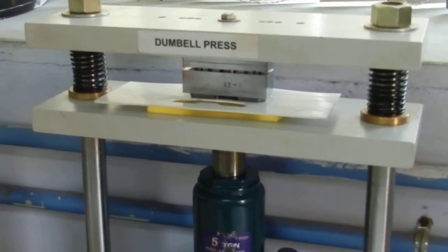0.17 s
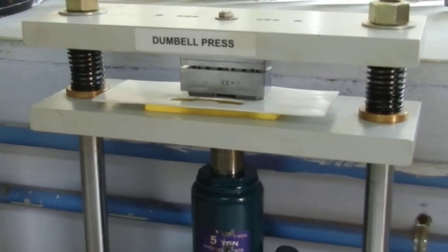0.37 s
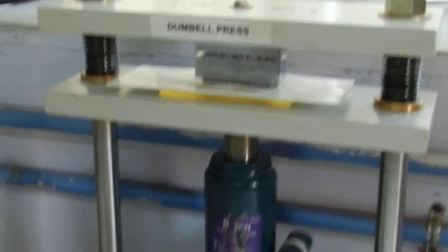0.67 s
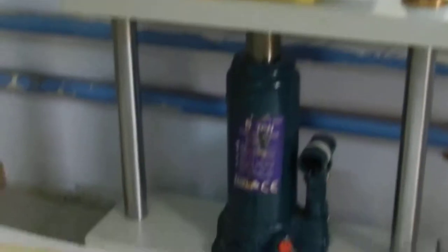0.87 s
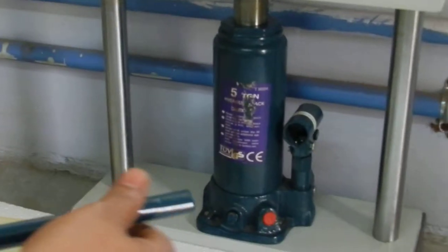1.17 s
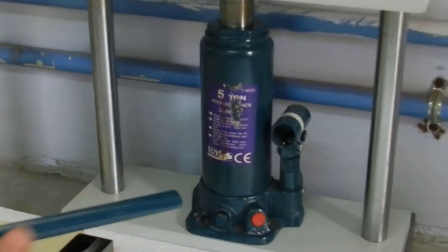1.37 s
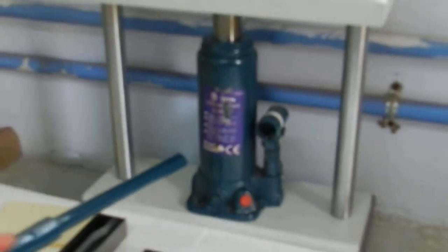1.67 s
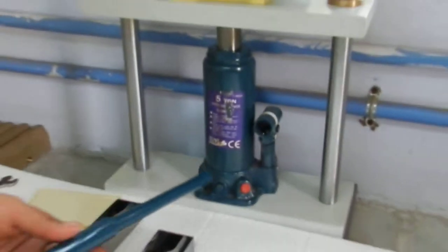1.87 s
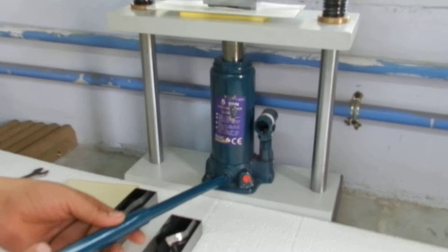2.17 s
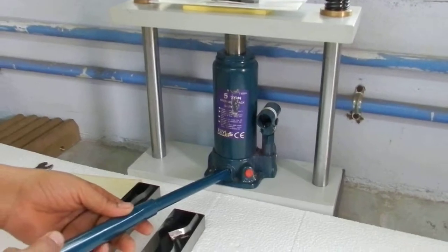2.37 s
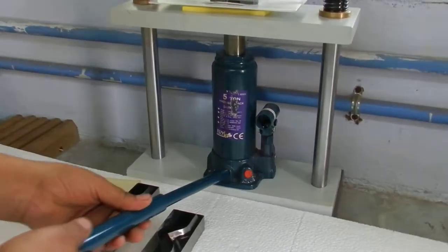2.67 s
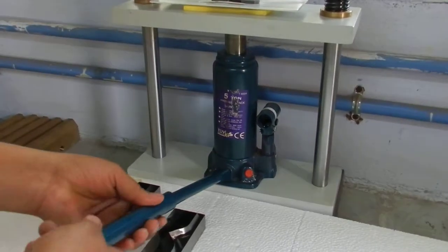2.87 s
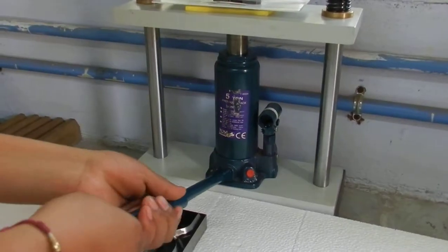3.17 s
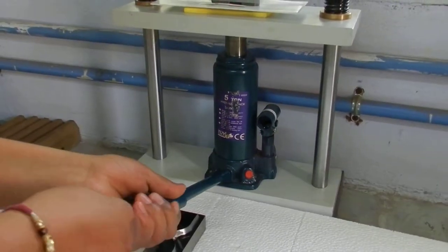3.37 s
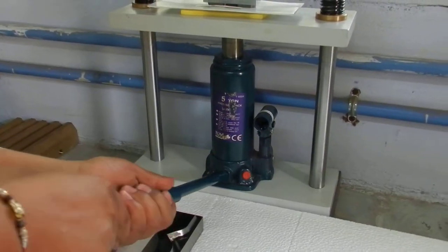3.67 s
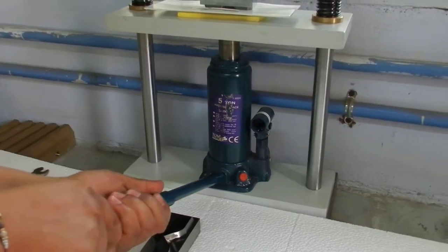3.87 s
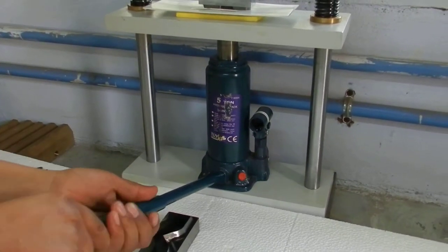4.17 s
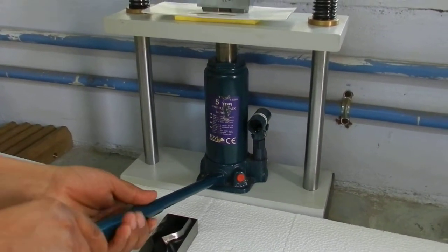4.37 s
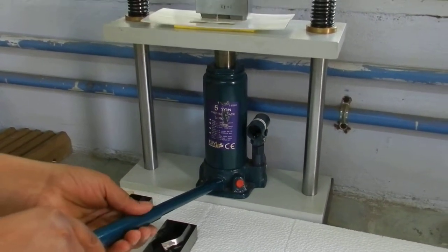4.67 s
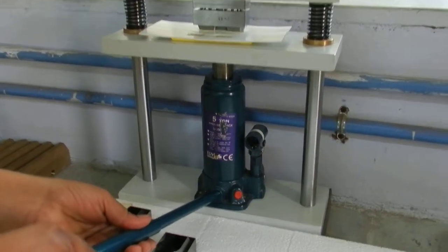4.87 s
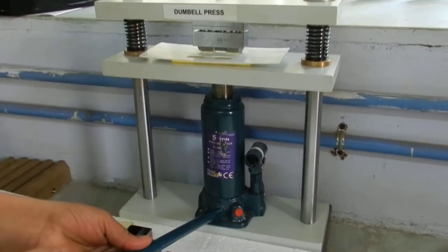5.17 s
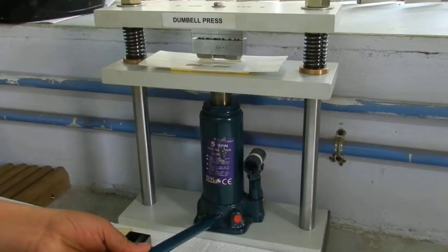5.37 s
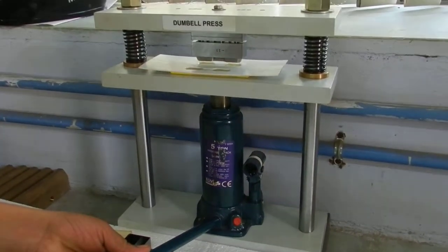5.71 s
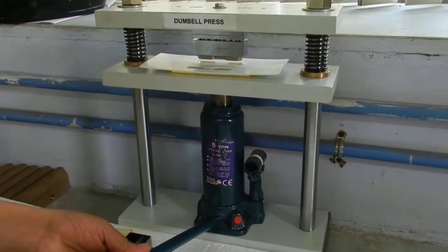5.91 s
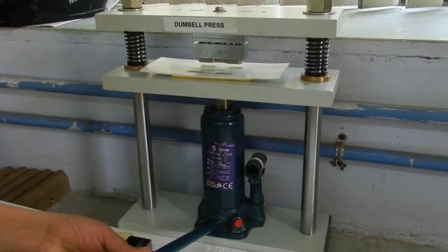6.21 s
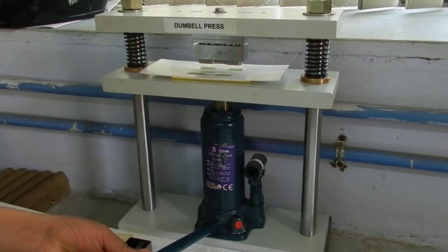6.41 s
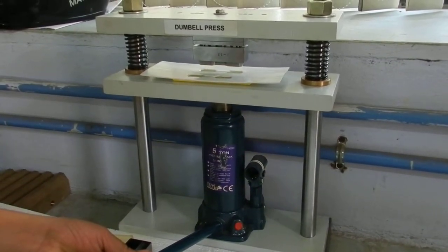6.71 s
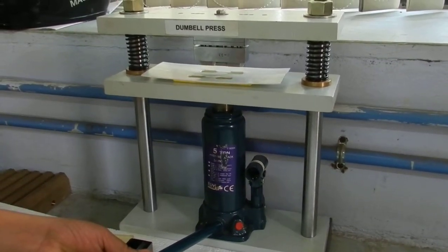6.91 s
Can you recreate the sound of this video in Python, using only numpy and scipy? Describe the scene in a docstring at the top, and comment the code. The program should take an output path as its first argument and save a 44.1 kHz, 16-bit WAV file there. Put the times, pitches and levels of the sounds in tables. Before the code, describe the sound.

From 0 to 1.4 s a large fan runs steadily in a workshop: a low, slightly wavering hum with buzzing overtones under a broad airy roar, while a faint high whine fades in. At about 1.45 s come tiny, dry metal ticks, slightly to the right. From 1.55 s a draught strikes the microphone, growing by 2 s into loud, lumpy low rumble. Until 6.5 s irregular short gusts and hard pressure pops follow several times a second, scattered between left and right, often stronger left, with brief lulls. The peaks clip, and the overall level suddenly ducks and climbs back repeatedly. The whine is clearest around 2 to 3 s, then weakens under the wind. Pops crowd between 3.5 and 6 s. After 6.5 s the wind collapses and the fan's hum and roar return, the deep hum weaker; a small soft gust puffs at about 6.85 s, then only fan remains until 7.1 s.

```python
"""A large fan hums and roars in a workshop; then its draught swings onto two microphone ports as a lumpy
rumble with short hard gusts and sharp pops that overload the input. The level drops and climbs back.
The hum is a set of sine waves tied to the fan shaft, the roar is filtered noise, and a thin whine and a few
metal ticks join them. The wind is made of sparse random kicks, filtered like swirling air at each port."""
import sys
import numpy as np
from scipy import signal
from scipy.fft import rfft, irfft
from scipy.io import wavfile
from scipy.ndimage import uniform_filter1d

SR = 44100
rng = np.random.default_rng(int(sys.argv[2]) if len(sys.argv) > 2 else 0)


def how_loud(loudness_db):
    """Turn decibels into a plain amplitude multiplier (0 dB gives 1, 20 dB gives 10)."""
    steps = np.asarray(loudness_db, float) / 20
    return 10 ** steps


def output_pcm(signal):
    """Save a mono or channel-first signal as 16-bit PCM at the path in sys.argv[1].

    Samples are clipped to [-1, 1] before scaling.
    """
    pcm = np.clip(np.atleast_2d(signal).T, -1, 1) * 32767
    wavfile.write(sys.argv[1], SR, np.round(pcm).astype(np.int16))


N = 310890  # length of the scene [samples]

# colour of swirling air at a port, before it is stretched: (frequency [Hz], relative level per Hz [dB])
EDDY_SPECTRUM = [(20, -22), (45, -20), (90, 4), (160, 0), (300, -4), (550, -15.5), (1000, -28.5),
                 (2000, -54), (4000, -59.5), (16000, -85)]


def evened(x):
    """Scales a sound to an rms of 1 along time."""
    return x / np.sqrt(np.mean(x ** 2, -1, keepdims=True) + 1e-20)


def read_spectrum(points, hz):
    """Reads a table of (frequency, value) between its points, on a log-frequency axis."""
    f, value = np.transpose(points)
    return np.interp(np.log(hz + 1), np.log(f + 1), value)


def curve(rows):
    """Joins rows of (time [s], value, ..) with straight lines into one track for each value column."""
    s, *columns = np.transpose(rows)
    return np.array([np.interp(np.arange(N) / SR, s, column) for column in columns])


def add(mix, s, sound):
    """Mixes a sound into one channel, centred on time s [s]."""
    part = mix[round(s * SR) - len(sound) // 2:][:len(sound)]
    part += sound[:len(part)]


def drift(per_s, count=1):
    """Makes slow random wandering of rms 1 that changes about per_s times a second."""
    hz = np.fft.rfftfreq(N, 1 / SR)
    smooth = np.exp(-(hz / per_s) ** 2)
    return evened(irfft(rfft(rng.standard_normal((count, N))) * smooth, N))


def jumps(shape):
    """Sparse kicks of random size over a little noise: the bass blends, the treble stays in separate edges."""
    jumps_per_s = 650
    kicks = rng.standard_normal(shape) * (rng.random(shape) < jumps_per_s / SR)
    return evened(kicks) + 0.3 * rng.standard_normal(shape)


def colour(x, spectrum, stretch=1):
    """Filters without delay; faster air stretches the whole spectrum upwards."""
    hz = np.fft.rfftfreq(x.shape[-1], 1 / SR)
    gain = how_loud(read_spectrum(spectrum, hz / stretch))
    return evened(irfft(rfft(x) * gain, x.shape[-1]))


def fan_roar():
    """Patchy air noise coloured by the resonances of the fan housing, partly alike at the two ports."""
    # air noise of the fan: (frequency [Hz], relative level per Hz [dB])
    air_noise = [(20, -24), (52, -35), (75, -11), (170, -8), (230, -6.5), (450, -7), (500, -9), (1010, -7),
                 (1350, -15), (2660, -25.5), (6650, -30), (8250, -36.5), (11000, -35), (12500, -41),
                 (15700, -39.5), (16000, -80)]
    # housing resonances: (frequency [Hz], width [Hz], boost [dB])
    housing = [(100, 16.6, 11), (1001, 21, 5.5), (1816, 220, 5.5), (2042, 26, 5.5), (3360, 680, 3.5),
               (6470, 1300, 3.5)]
    # how alike the ports are: (frequency [Hz], left-right likeness [-1 to 1])
    likeness = [(60, 0.82), (130, 0.95), (290, 0.92), (640, 1), (1410, 0.91), (3100, 0.65), (6820, 0.48),
                (15000, -0.28)]
    # balance of the ports: (frequency [Hz], left minus right [dB])
    lean = [(60, 3), (180, 0.5), (550, 3), (1650, -0.5), (4970, -2), (15000, 1)]

    frames, hz = N // 1024 + 5, np.fft.rfftfreq(4096, 1 / SR)
    a, b, c, d, patches = rng.standard_normal((frames, 2049, 5)).T
    # neighbouring frequencies and moments swell together
    patches = uniform_filter1d(patches, size=40, axis=0)
    patches = evened(uniform_filter1d(patches, size=3, axis=1))

    same = np.clip(read_spectrum(likeness, hz), -1, 1)[:, None]
    left = a + 1j * b
    right = same * left + np.sqrt(1 - same ** 2) * (c + 1j * d)
    resonance_db = sum(db / (1 + (2 * (hz - f) / width) ** 2) for f, width, db in housing)
    colour_db = read_spectrum(air_noise, hz) + resonance_db
    lean_db = np.outer([0.5, -0.5], read_spectrum(lean, hz))
    gain = how_loud((colour_db + lean_db)[:, :, None] + 0.91 * patches)
    roar = signal.istft(np.array([left, right]) * gain, nperseg=4096, noverlap=3072)[1][:, :N]
    level_db = -24 + 0.5 * drift(3.5)
    return how_loud(level_db) * roar / roar.std()


def shaft_hum():
    """Sine waves at multiples of a slightly wavering shaft speed, each wandering in level."""
    # tones of the shaft: (multiple of the shaft speed, level [dB])
    orders = [(1, -54), (3, -32.5), (4, -40.5), (6, -30), (7, -43), (9, -52), (10, -37), (12, -36),
              (15, -42), (16, -44), (21, -42), (24, -43.5), (30, -42)]
    # the deep hum is weaker once the draught blows: (time [s], level [dB])
    deep_fade = [(1.55, -0.5), (2., -1), (6.75, -8.5), (7.05, -4)]
    shaft_hz, deep_hz = 37.48, 300  # the fade applies below deep_hz

    turns = np.cumsum(shaft_hz * (1 + 0.001495 * drift(1.55)[0])) / SR
    beats_db = 1.6 * drift(6.0, count=len(orders))
    fade_db = curve(deep_fade)[0]
    hum = np.zeros(N)
    for (multiple, db), beat_db in zip(orders, beats_db):
        level_db = db + beat_db + fade_db * (multiple * shaft_hz < deep_hz)
        hum += how_loud(level_db) * np.sin(2 * np.pi * (multiple * turns + rng.random()))
    return np.sqrt(2) * hum * how_loud([[0.8], [-0.8]])  # a little louder on the left


def thin_whine():
    """One high sine wave that comes and goes, with an unsteady pitch and a flickering level."""
    # loudness of the whine: (time [s], level [dB])
    loudness = [(0, -78), (.8, -56), (1.45, -49.5), (2.1, -47.5), (3.1, -47.5), (3.55, -57), (3.7, -62),
                (7.1, -57)]
    whine_hz = 2794
    turns = np.cumsum(whine_hz + 9.6 * drift(21.0)[0]) / SR
    flicker_db = 2.5 * drift(20.0)[0]
    return np.sqrt(2) * how_loud(curve(loudness)[0] + flicker_db) * np.sin(2 * np.pi * turns)


def metal_ticks():
    """Each small metal tick is one ringing tone that dies away by 60 dB in 4.2 ms."""
    # ticks: (time [s], level [dB], pitch [Hz])
    tick_list = [(1.437, -30, 3960), (1.472, -17, 4570), (1.472, -26, 3300)]
    out, t = np.zeros(N), np.arange(600) / SR
    for s, db, hz in tick_list:
        tick = how_loud(db - 60 * t / 0.0042) * np.sin(2 * np.pi * hz * t)
        add(out, s + t[300], tick)  # centred half its length later, so it starts at s
    return out * how_loud([[-1.5], [1.5]])  # a little louder on the right


def lumpy_breeze():
    """The steady part of the draught: separate turbulence at each port, with more fast eddies when strong."""
    # strength of the draught: (time [s], left port level [dB], right port level [dB])
    strength = [(1.5, -47, -49), (1.55, -17, -26), (1.75, -11.5, -16), (1.97, -3.5, -1.5), (2.4, 2, 2.5),
                (2.67, -1.5, -2), (2.95, 3.5, 0.5), (3.07, -7.5, -11.5), (3.5, -11, -10.5), (3.75, 0, -4),
                (3.93, -8, -6), (4.07, -3.5, -6), (4.35, -5.5, -8.5), (4.55, 3.5, 1), (4.77, 4, -0.5),
                (4.91, -7.5, -6.5), (5.35, -6, -5), (5.55, -3, 0), (6.0, -8, -13.5), (6.48, -12, -13),
                (6.53, -27, -29), (6.78, -29, -27), (6.84, -17, -19), (6.91, -18, -18), (6.94, -26, -30),
                (7.05, -32, -35)]
    # brief lulls in the draught: (time [s], depth [dB])
    lulls = [(1.76, -5), (2.175, -17), (2.632, -13), (3.945, -9), (4.285, -9), (5.0, 0), (5.885, -13),
             (6.265, -10)]
    lull_s = 0.012  # from the middle of a lull to where its depth has shrunk to about a third
    still_db, fast_per_db = -11, 0.03  # above still_db the share of fast eddies grows with every dB

    t, breeze_db = np.arange(N) / SR, curve(strength)
    lumps_db = 2.0 * drift(21.0, count=2) + 3.0 * drift(78.0, count=2)
    lulls_db = sum(db * np.exp(-((t - s) / lull_s) ** 2) for s, db in lulls)
    fast = np.clip(fast_per_db * (breeze_db.mean(0) - still_db), 0, 1)
    kicks = jumps((2, N))
    slow_eddies = colour(kicks, EDDY_SPECTRUM, 0.89)
    fast_eddies = colour(kicks, EDDY_SPECTRUM, 1.58)
    turbulence = (1 - fast) * slow_eddies + fast * fast_eddies
    return how_loud(breeze_db + lumps_db + lulls_db) * turbulence


def pop_shape():
    """One short pressure jump of peak size 1, as a complex signal whose phase can be turned."""
    # colour of a pop: (frequency [Hz], relative level per Hz [dB])
    pop_spectrum = [(60, -24), (220, -3), (400, 0), (800, -8), (1500, -25), (2500, -46), (16000, -85)]
    pop = signal.hilbert(colour(signal.unit_impulse(4096, "mid"), pop_spectrum))[1024:-1024]
    return pop / abs(pop).max()


def turned(pop, turn):
    """Turns the phase by a part of a full turn, giving a spike, a step or anything between."""
    return (pop * np.exp(2j * np.pi * turn)).real


def hard_gusts():
    """Short bursts of turbulence shared between the ports, higher in pitch when strong, each with a pop."""
    # gusts: (time [s], share of power on the right port [0-1], level [dB], nominal length [ms])
    gust_list = [(1.572, 0.05, -8, 35), (1.621, 1, -9.5, 30.7), (1.664, 0.6, -2.5, 29),
                 (1.702, 0.3, -4, 23), (1.797, 0.95, -6, 30), (1.823, 0.04, -4, 20), (1.87, 0.6, -3, 31.4),
                 (1.905, 0.85, 2.5, 48), (1.953, 0, -4.5, 30), (1.978, 1, 3.5, 27.3),
                 (2.128, 0.06, -4.5, 57), (2.196, 0.2, 5, 20.2), (2.305, 1, 2, 21.4), (2.335, 1, 4, 24),
                 (2.417, 0, 4.5, 34), (2.562, 0.4, 2.5, 15), (2.59, 0, 4, 31), (2.69, 0, -0.5, 42),
                 (2.812, 0.45, 2, 20), (2.866, 0.98, 2.5, 27), (2.925, 0.24, 2, 31.4), (3.013, 0.6, 3, 27),
                 (3.14, 0.65, -0.5, 38), (3.23, 0.04, 2, 19.5), (3.285, 0.06, 1, 22.5),
                 (3.348, 0.56, -1, 32), (3.515, .1, 6, 30), (3.573, 0.17, 1.5, 22.2),
                 (3.607, 0.3, 2.5, 21.5), (3.67, 0, 6, 14.8), (3.79, 1, 6, 27.2), (3.879, 0.07, 6, 23.6),
                 (3.9, 0.24, 5.5, 23), (3.974, .3, 2.5, 16.2), (4.06, 1, 4.5, 16), (4.087, 0.22, 5, 32),
                 (4.138, 0.84, 2.5, 33), (4.218, 0.2, 3.5, 30.5), (4.255, 0.13, 6.5, 14),
                 (4.326, .2, 2.5, 42), (4.396, 0.96, -1, 15.8), (4.434, 0.02, 3, 61),
                 (4.553, 0.97, 2.5, 34), (4.635, 1, -0.5, 58), (4.742, 0.23, 5.5, 24),
                 (4.913, 0.03, 3, 23.3), (4.96, 0.42, 2.5, 34.3), (5.049, .2, 2.5, 48),
                 (5.115, 0.03, -1.5, 25), (5.189, 0.2, 2.5, 26), (5.237, 0.42, 7.5, 32.5),
                 (5.296, 0.99, 4, 32), (5.326, 0.04, 4, 36), (5.398, 0.05, 6.5, 31), (5.465, 0.07, 4, 39),
                 (5.558, 0, 2.5, 23), (5.736, 0.44, 5, 31.3), (5.774, 0, 0.5, 17), (5.816, 0.62, 5, 22.4),
                 (5.853, 0, -2, 20), (5.917, 0.33, 8.5, 32.3), (5.963, 0.94, -1.5, 35.4),
                 (6.071, 0.99, -0.5, 35), (6.117, 0.05, 0.5, 44), (6.172, 0.7, -7.5, 17.5),
                 (6.232, 0.8, -9, 16), (6.316, 0.45, 3, 44), (6.384, 0, -6, 20), (6.428, 0, 2, 19.4),
                 (6.446, 0.94, -1, 53), (6.496, .3, 1, 25.7), (6.824, 0, -10.5, 19),
                 (6.873, 0.22, -2.5, 46)]
    usual_hz, spread, faster_per_db = 197, 0.13, 0.0315  # eddy pitch at 0 dB, its chance and its rise
    pop_db = 0.5  # level of the pop over that of its gust

    out, pop = np.zeros((2, N)), pop_shape()
    all_kicks = jumps((len(gust_list), 2, 8192))
    chances = rng.random((len(gust_list), 3))
    for (s, share, db, ms), kicks, chance in zip(gust_list, all_kicks, chances):
        window = np.hanning(int(1.8 * ms / 1000 * SR))
        right = np.clip(share, 0, 1)
        kicks[:, len(window) // 2] += 16.5 * np.sign(kicks[:, 0])  # the main shove lands mid-gust
        eddy_hz = usual_hz * np.exp(faster_per_db * db + spread * (2 * chance[0] - 1))
        swirl = colour(kicks, EDDY_SPECTRUM, eddy_hz / 200)  # the table is centred on 200 Hz
        gust = evened(swirl[:, :len(window)] * window)
        pop_s = s + (chance[1] - 0.5) * ms / 1000
        for port, power in enumerate([1 - right, right]):
            gain = np.sqrt(power) * how_loud(db)
            add(out[port], s, gain * gust[port])
            add(out[port], pop_s, gain * how_loud(pop_db) * turned(pop, chance[2]))
    return out


def sharp_pops():
    """The sharpest pressure jumps inside the wind, each at one port."""
    # pops: (time [s], port [0 left, 1 right], level [dB])
    pop_list = [(2.196, 0, 12), (2.302, 1, 12), (2.422, 0, 18), (2.567, 0, 9), (2.735, 1, 8), (2.81, 1, 8),
                (2.925, 0, 12.5), (3.014, 1, 18), (3.336, 1, 7.5), (3.611, 0, 15), (3.871, 0, 11),
                (3.973, 1, 8.5), (4.08, 0, 16), (4.208, 0, 14), (4.329, 0, 9), (4.397, 1, 10.5),
                (4.438, 0, 11), (4.556, 0, 13.5), (4.651, 0, 13.5), (4.674, 1, 5), (4.737, 0, 14.5),
                (4.964, 1, 12), (5.047, 0, 13), (5.296, 1, 10), (5.402, 0, 7), (5.487, 1, 9), (5.813, 0, 6),
                (5.85, 0, 11), (5.923, 1, 9), (5.934, 0, 12), (6.296, 1, 11), (6.429, 0, 14.5)]
    out, pop = np.zeros((2, N)), pop_shape()
    for (s, port, db), turn in zip(pop_list, rng.random(len(pop_list))):
        add(out[round(port)], s, how_loud(db) * turned(pop, turn))
    return out


def draught():
    """Wind made at each port, then widened by subtracting some of the other port."""
    wind = lumpy_breeze() + hard_gusts() + sharp_pops()
    # the deepest bass is widened less
    crossed = signal.lfilter(*signal.butter(1, 30.0, "high", fs=SR), wind[::-1])
    return wind - 0.29 * crossed


def scene():
    """Adds the fan, the ticks and the draught into left and right channels."""
    return fan_roar() + shaft_hum() + thin_whine() + metal_ticks() + draught()


def band_limit(x):
    """A steep low-pass at the top of the band."""
    return signal.sosfilt(signal.butter(12, 15910, fs=SR, output="sos"), x)


def record(dry):
    """Sudden drops in level with a slow climb back, then an overloaded input that rounds and clips peaks."""
    # drops: (time [s], level just after the drop [dB])
    drops = [(1.662, -9.5), (1.797, -7.5), (1.903, -10.5), (1.953, -10.5), (1.983, -19), (2.196, -17),
             (2.456, -15.5), (2.81, -13), (2.936, -15), (3.509, -12.5), (3.622, -14), (3.769, -17),
             (3.9, -15), (4.074, -16), (4.222, -15.5), (4.408, -16.5), (4.556, -15.5), (4.72, -18.5),
             (5.05, -12.5), (5.241, -15), (5.417, -19), (5.827, -16.5), (5.92, -14.5), (6.13, -16),
             (6.439, -16)]
    climb_db_per_s = 17.5
    t, level_db = np.arange(N) / SR, np.zeros(N)
    for s, db in drops:
        after = t >= s
        level_db[after] = np.minimum(db + climb_db_per_s * (t[after] - s), 0)
    ducked = dry * how_loud(uniform_filter1d(level_db, size=500))
    # the input stage rounds the tops before they are cut off flat
    rounded = ducked / (1 + abs(ducked / 1.046) ** 2.6) ** (1 / 3.56)
    clipped = np.clip(rounded, -1, 1)
    return band_limit(clipped)


dry = scene()
out = record(dry)
output_pcm(out)
```